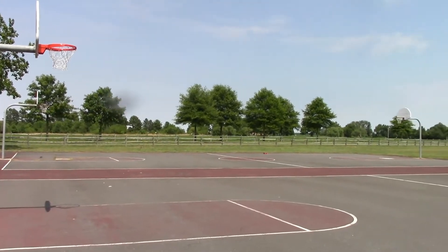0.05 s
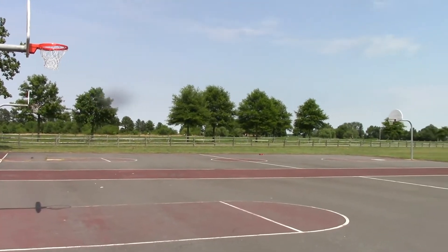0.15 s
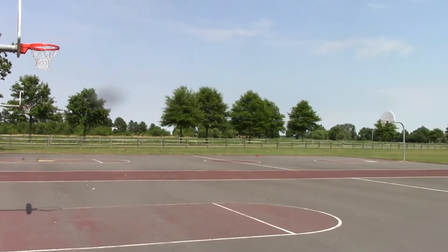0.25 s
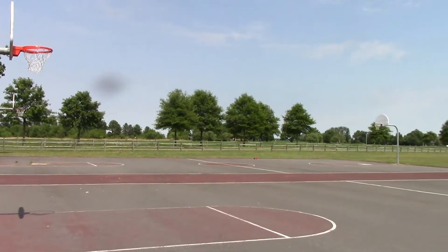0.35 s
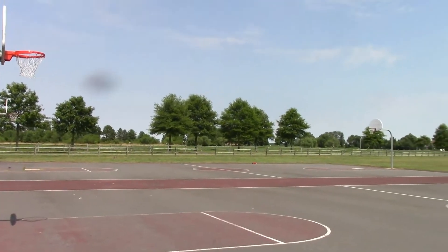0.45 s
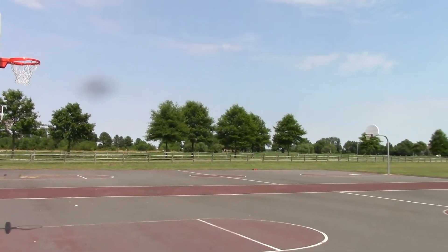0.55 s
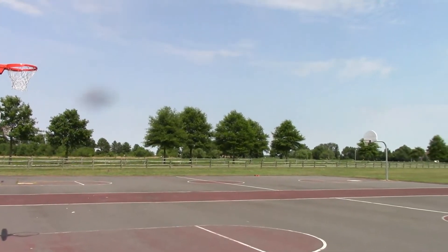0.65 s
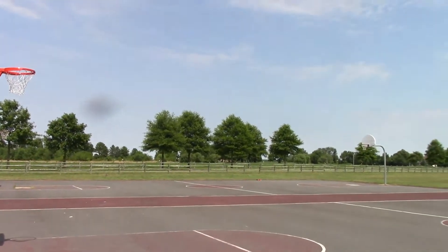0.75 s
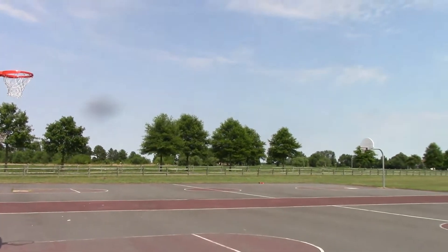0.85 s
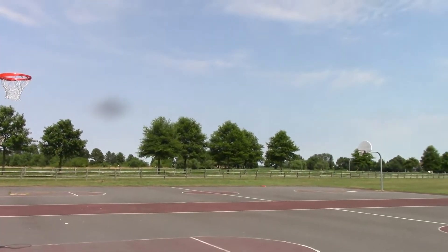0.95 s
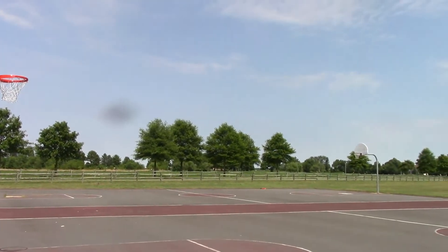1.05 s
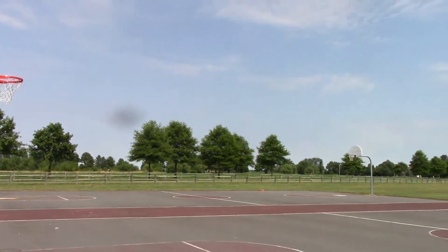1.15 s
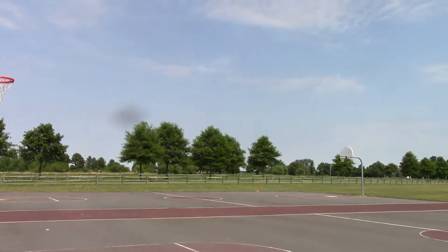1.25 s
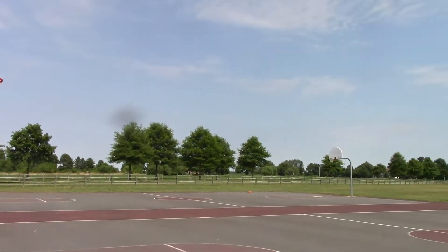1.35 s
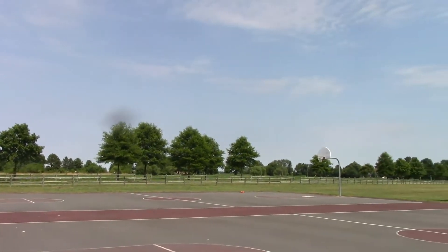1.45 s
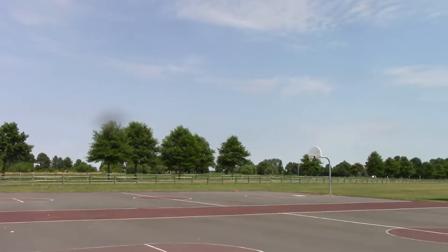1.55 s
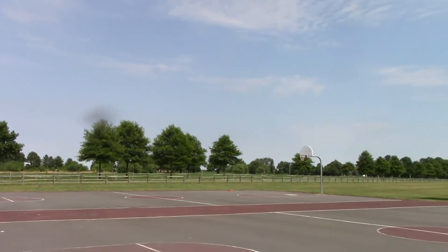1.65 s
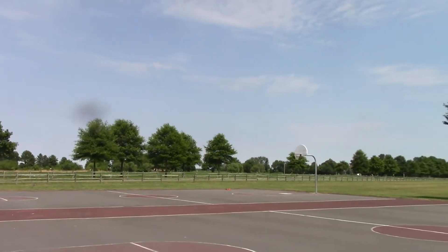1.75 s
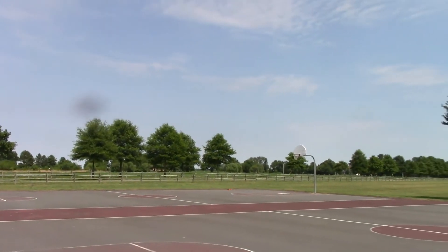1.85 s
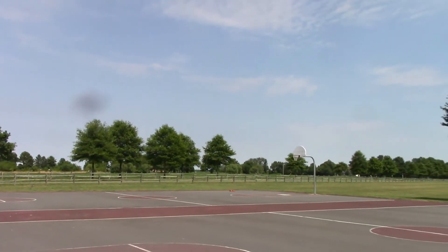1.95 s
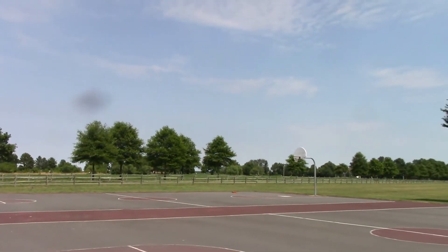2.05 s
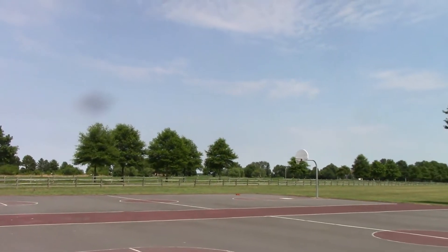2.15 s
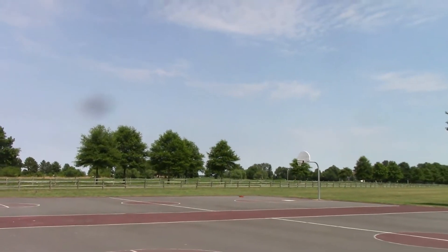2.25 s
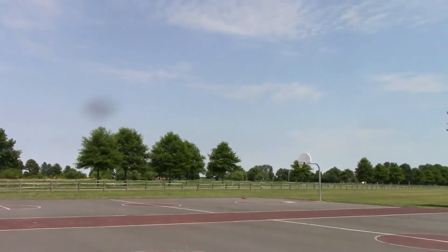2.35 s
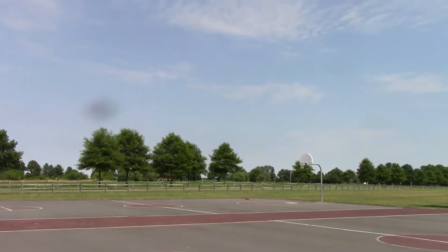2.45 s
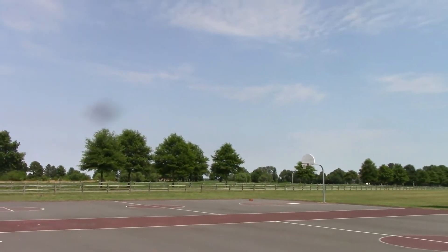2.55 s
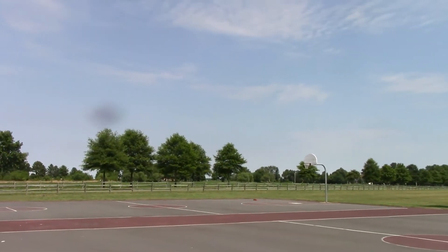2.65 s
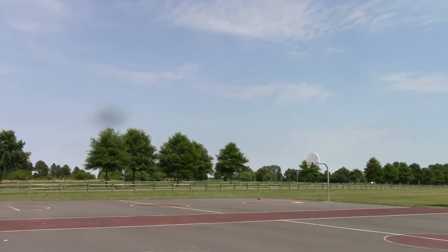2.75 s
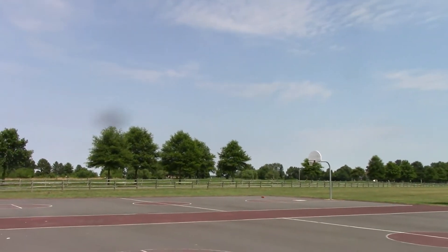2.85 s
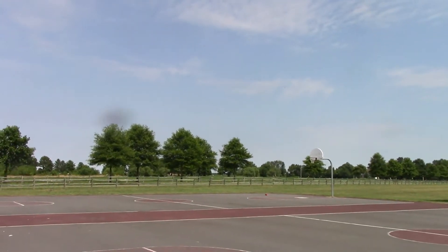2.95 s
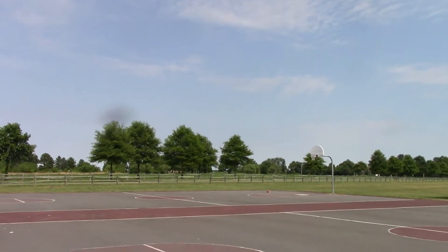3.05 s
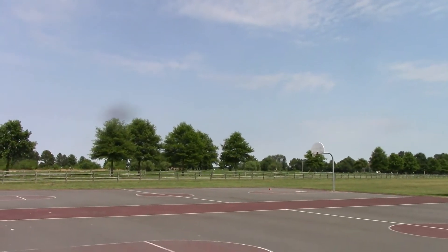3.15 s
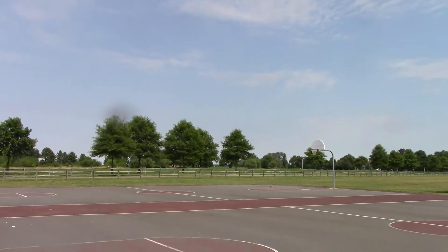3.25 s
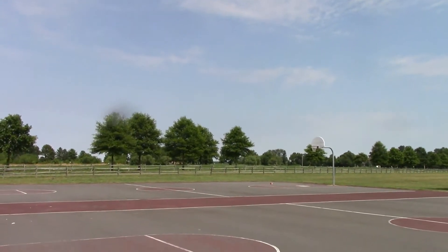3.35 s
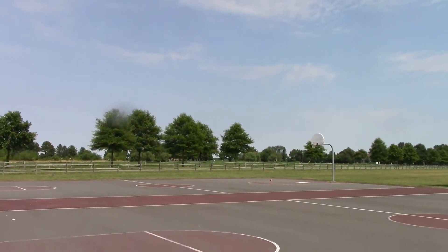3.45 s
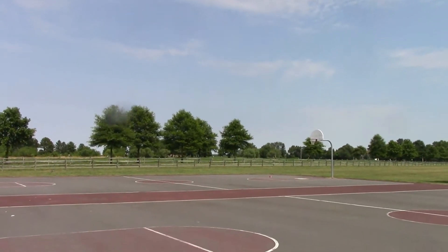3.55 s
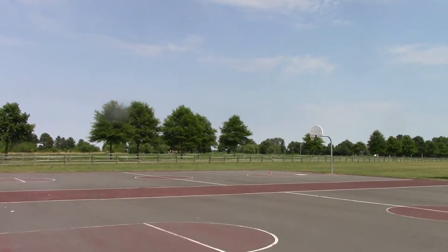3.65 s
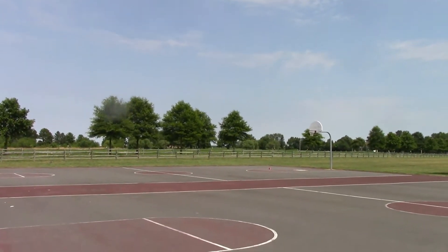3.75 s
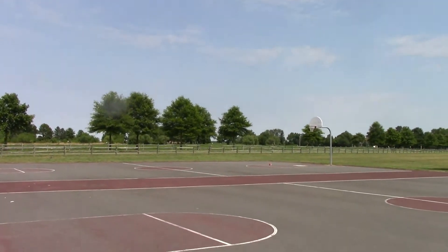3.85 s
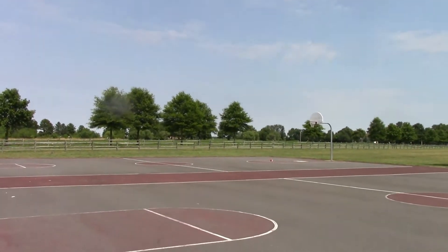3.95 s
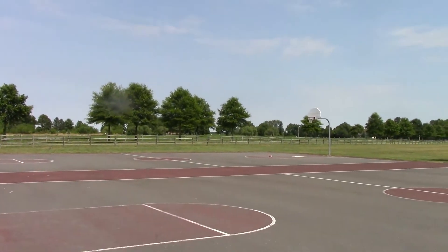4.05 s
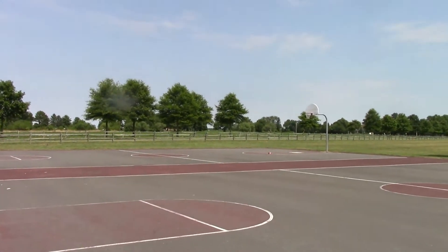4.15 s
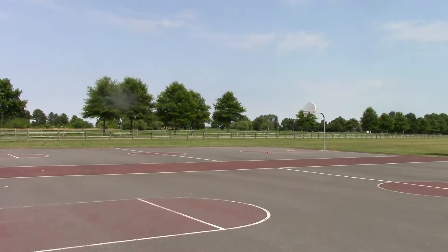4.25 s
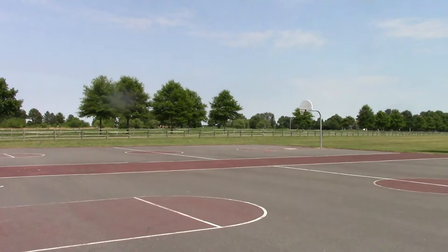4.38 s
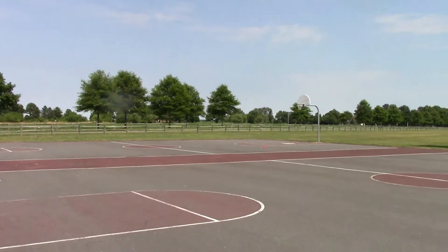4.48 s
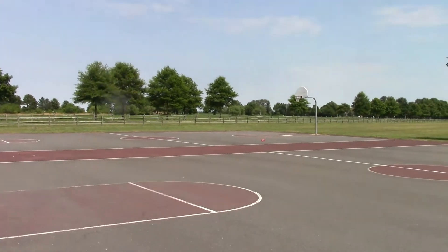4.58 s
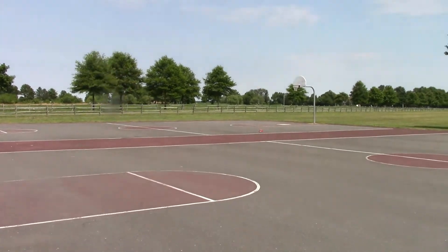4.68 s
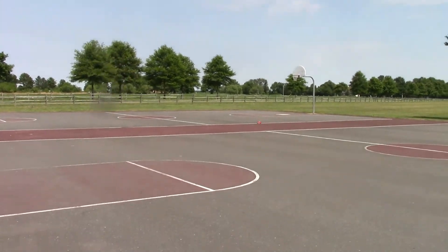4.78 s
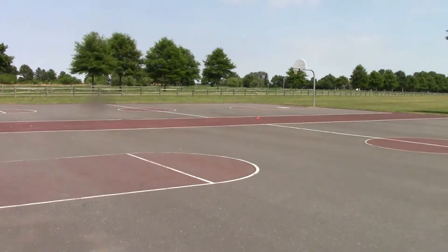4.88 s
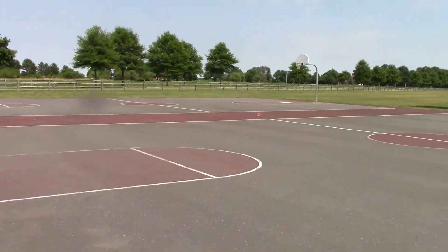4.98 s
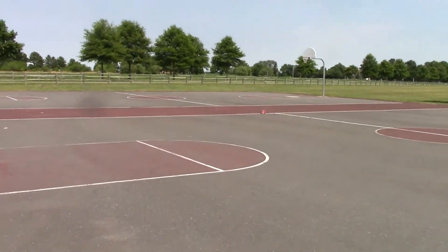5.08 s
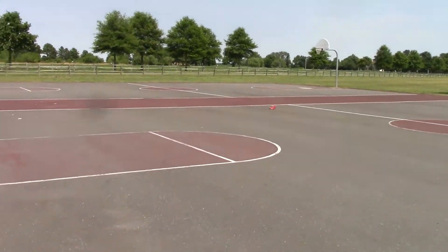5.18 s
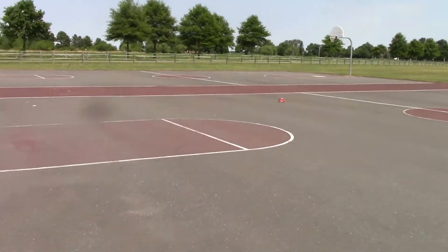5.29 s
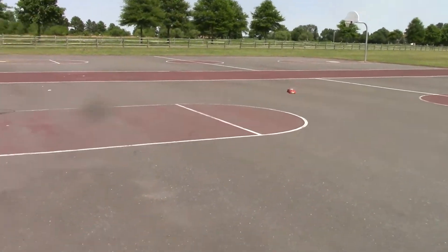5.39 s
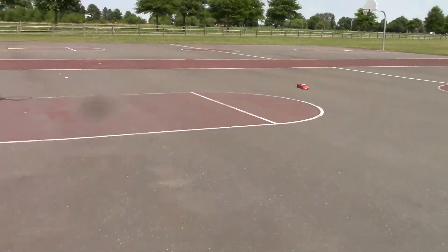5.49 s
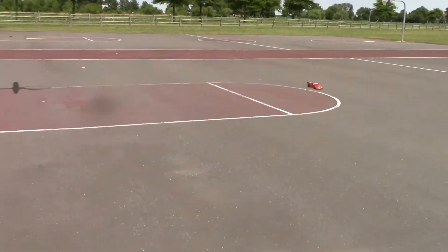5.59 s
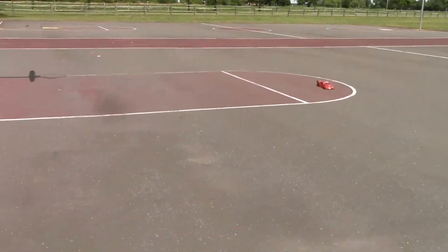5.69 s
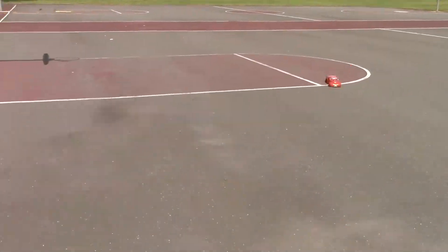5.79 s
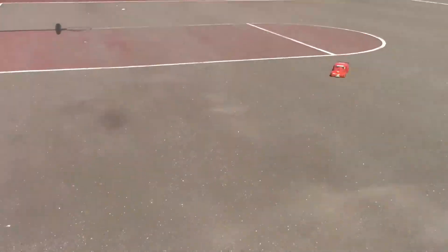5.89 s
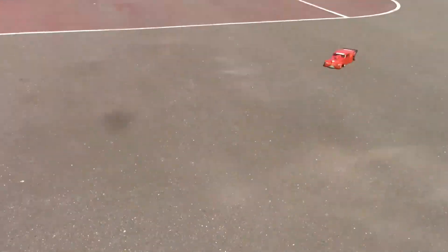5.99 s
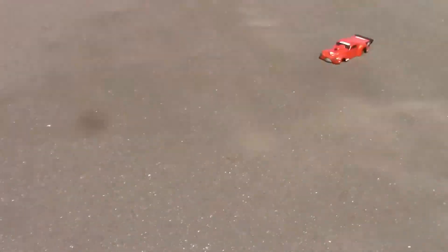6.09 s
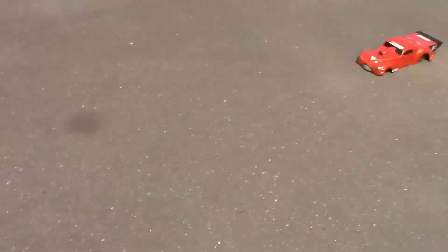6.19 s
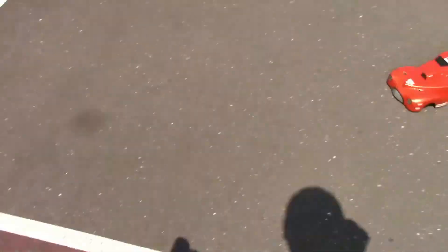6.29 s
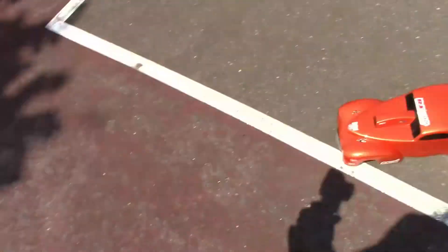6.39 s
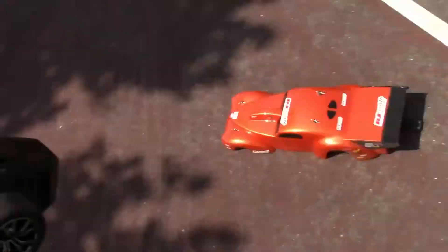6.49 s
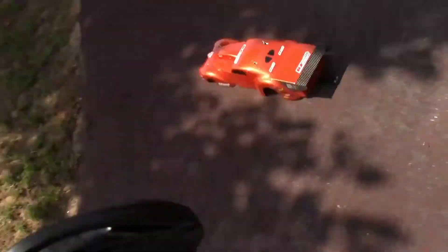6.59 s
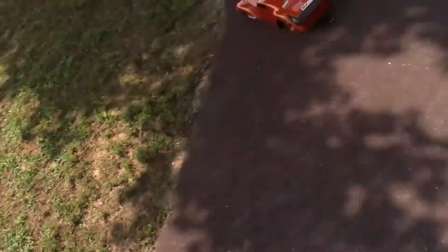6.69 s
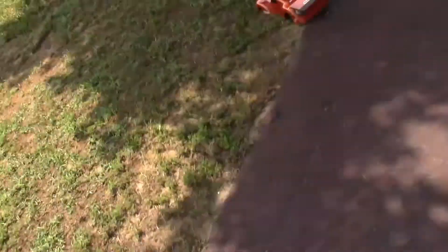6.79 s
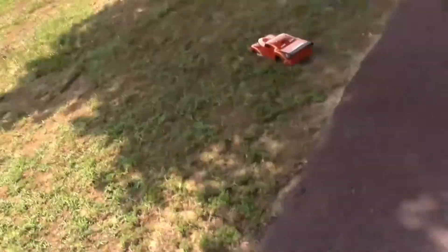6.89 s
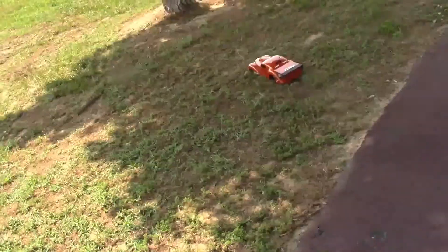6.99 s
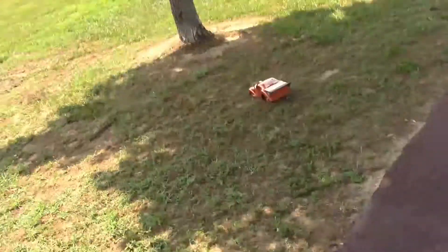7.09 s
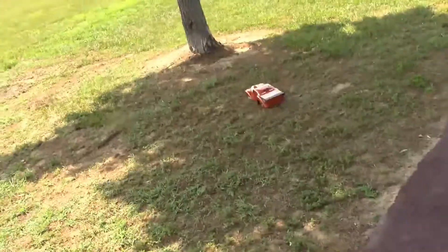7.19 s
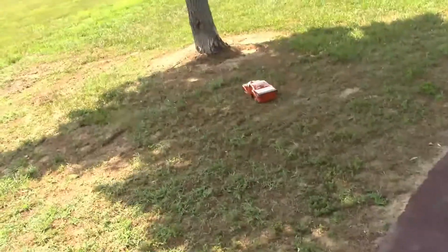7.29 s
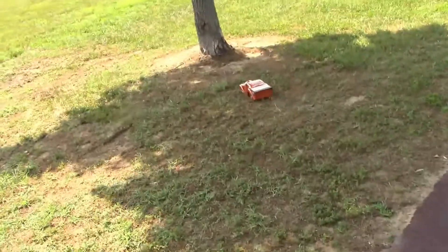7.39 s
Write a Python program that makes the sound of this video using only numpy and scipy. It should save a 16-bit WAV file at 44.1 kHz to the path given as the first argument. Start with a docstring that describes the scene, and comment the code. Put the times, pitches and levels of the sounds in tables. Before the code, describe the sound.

Wind buffets over quiet outdoor hiss and a few bird chirps, then a small remote-control car rushes up, clatters past loudly and fades.

```python
"""Asphalt court edged by grass: an electric toy car races in, passes at the listener's feet and bounces off.
Grit under the tyres and bumps drive a resonant plastic shell and noisy treads; chassis scrapes ring too.
The motor whine surges when the wheels skip; gears whirr in two narrow bands of smeared tone.
Leaves and far traffic hiss as filtered noise, soft rustles sound close by, a far buzz throbs in two spells.
A bird chirps in falling sine sweeps; gusts, slaps of air and the car's wake buffet the two ports as low noise."""
import sys
import numpy as np
from scipy import signal
from scipy.fft import rfft, irfft, next_fast_len
from scipy.io import wavfile

SR = 44100
rng = np.random.default_rng(int(sys.argv[2]) if len(sys.argv) > 2 else 0)


def digitize_waveform(pressure):
    """Quantize a signal to 16-bit integers and store it at the path in sys.argv[1].

    Rows of a 2-D input are taken as channels; values are limited to [-1, 1].
    """
    field = np.atleast_2d(pressure).T
    bounded = np.clip(field, -1, 1)
    quanta = np.round(bounded * 32767).astype(np.int16)
    wavfile.write(sys.argv[1], SR, quanta)


N = 327663

# Plastic shell resonances. Each row: frequency in Hz, width in Hz, relative level in dB.
SHELL_MODES = [(760, 480, -2), (1400, 520, -1), (2070, 480, -1), (2700, 650, -2), (3450, 600, -7)]
# Tread noise spectrum. Each row: frequency in Hz, relative density in dB per Hz.
TREAD_SPECTRUM = [(2350, -5.5), (4000, -4), (4730, 1.5), (5580, 0), (6750, 5), (9600, 1.5), (12500, -22),
                  (21100, -120)]

TIME = np.arange(N) / SR
BINS_HZ = np.maximum(np.fft.rfftfreq(next_fast_len(N), 1 / SR), 1)
LEFT_RIGHT = np.array([[1], [-1]])   # opposite signs at the two ports


def amp(db):
    """Decibels to gain."""
    return 10 ** (np.asarray(db) / 20)


def rms_one(x):
    """Scale to rms 1."""
    return x / np.sqrt(np.mean(x ** 2) + 1e-20)


def in_time(rows):
    """Columns of a curve over time, one value a sample."""
    s, *columns = np.transpose(rows)
    return [np.interp(TIME, s, column) for column in columns]


def on_bins(points):
    """A (Hz, value) table read at every spectral bin, along log frequency."""
    hz, value = np.transpose(points)
    return np.interp(np.log(BINS_HZ), np.log(hz), value)


def colour(x, gain):
    """Filter by a gain per bin."""
    size = next_fast_len(N)
    return irfft(rfft(x, size) * gain, size)[..., :N]


def butterworth(x, order, hz, kind="low"):
    """Butterworth filter with the given corner or corners."""
    return signal.sosfilt(signal.butter(order, hz, kind, fs=SR, output="sos"), x)


def drift(rate_hz):
    """Slow random wander of rms 1: noise through two equal low-pass poles."""
    r = np.exp(-2 * np.pi * rate_hz / SR)
    noise = rng.standard_normal(N + SR)
    settled = signal.lfilter([1], [1, -2 * r, r * r], noise)[SR:]
    return rms_one(settled)


def ring(x, hz, width_hz):
    """Two-pole resonance with gain 1 on top."""
    r = np.exp(-np.pi * width_hz / SR)
    zeros = [(1 - r * r) / 2, 0, (r * r - 1) / 2]
    poles = [1, -2 * r * np.cos(2 * np.pi * hz / SR), r * r]
    return signal.lfilter(zeros, poles, x + 1e-18)


def bursts(times_s, levels_db, t60s, rises_s):
    """Envelope of blows: a short linear rise, then an exponential fade."""
    out = np.zeros(N)
    for s, level_db, t60_s, rise_s in np.broadcast(times_s, levels_db, t60s, np.maximum(rises_s, 1e-4)):
        t = np.arange(int((t60_s + rise_s) * SR)) / SR
        fade = amp(level_db - 60 * np.maximum(t - rise_s, 0) / t60_s)
        blow = fade * np.minimum(t / rise_s, 1)
        i = round(s * SR)
        out[i:i + len(t)] += blow[:N - i]
    return out


def swells(middles_s, heights, halves_s):
    """Sum of bell-shaped swells, each down to 1/e at its half length."""
    return sum(h * np.exp(-((TIME - s) / half_s) ** 2) for s, h, half_s in zip(middles_s, heights, halves_s))


def grit(per_s, spread_db):
    """Random clicks of uneven size and sign, as from stones under a tyre; two unrelated streams."""
    sizes = amp(spread_db * np.minimum(rng.exponential(1, (2, N)), 5))
    signs = rng.choice([-1, 1], (2, N))
    struck = rng.random((2, N)) < per_s / SR
    return sizes * signs * struck


def narrow_tone(hz, width_hz):
    """A tone of rms 1 smeared by slow noise on its cosine and sine; width_hz is the noise corner."""
    phase = 2 * np.pi * np.cumsum(hz) / SR
    return rms_one(drift(width_hz) * np.cos(phase) + drift(width_hz) * np.sin(phase))


def wind():
    """Eddies burst on the ports as lumpy low noise; weak gusts are duller than strong ones."""
    # Gusts before flutter. Each row: middle in seconds, peak in dB, half length in seconds, deep thud in dB.
    gust_rows = [(0.0, -31, 0.028, -60), (0.033, -28, 0.018, -60), (0.07, -26, 0.024, -66),
                 (0.117, -27.5, 0.037, -60), (0.204, -35.5, 0.045, -60), (.43, -51, 0.033, -56),
                 (0.676, -49, 0.085, -64), (0.849, -37.5, 0.038, -61), (1.02, -48, 0.024, -65),
                 (1.606, -54, 0.064, -59), (1.764, -55, 0.073, -63), (2.014, -55, 0.1, -67),
                 (2.125, -48, 0.039, -56), (2.287, -56, 0.061, -48), (2.396, -54, 0.014, -58),
                 (2.484, -48.5, 0.023, -52), (2.778, -62, 0.017, -62), (3.625, -80, 0.03, -54),
                 (4.406, -69, 0.65, -65), (5.142, -53, 0.058, -46), (5.28, -64, 0.073, -51),
                 (5.605, -40, 0.021, -39), (6.784, -60, .04, -80), (6.892, -46, 0.033, -77),
                 (7.16, -41, 0.045, -60), (7.375, -54, 0.16, -75)]
    # Slaps of air. Each row: start in seconds, level in dB, fade t60 in seconds, brightness 0-1.
    puff_rows = [(0.189, -25, 0.075, 1), (0.904, -28.5, 0.071, 1), (2.258, -29, 0.055, 0.2),
                 (3.314, -42.5, 0.08, 0.6), (5.092, -26, 0.051, 0.88), (5.673, -22.5, 0.098, 0.02)]
    # Eddy spectrum. Each row: frequency in Hz, relative density in dB per Hz.
    eddy_spectrum = [(65, -81), (110, -20), (208, 0.5), (422, 0.5), (461, 0.5), (584, -5.5), (1020, -14.5),
                     (1600, -26.5), (2080, -37), (3520, -120)]
    # Unlike part at the two ports. Each row: time in seconds, level relative to the common part in dB.
    side_rows = [(5.0, -59.5), (5.1, -17), (5.25, -58), (5.55, -23), (5.7, -19.5), (6.2, -18.5),
                 (6.45, -16.5), (6.6, -71)]
    # Air pushed by the car, before flutter. Each row: time in seconds, level in dB, low rumble in dB.
    wake_rows = [(5.44, -70, -68), (5.55, -43, -68), (5.66, -44, -58), (5.73, -29, -27), (5.84, -33, -31.5),
                 (5.9, -26, -28), (5.96, -26, -27.5), (6.13, -23.5, -24.5), (6.23, -23, -29),
                 (6.27, -8.5, -8), (6.3, -13.5, -14), (6.35, -9, -9), (6.38, -16, -19.5),
                 (6.46, -13, -14.5), (6.5, -14.5, -18), (6.53, -18.5, -36), (6.6, -27.5, -60),
                 (6.63, -62, -85)]
    calm_db, calm_thud_db = -66.5, -69.5   # floor between gusts

    s, peak_db, half_s, thud_db = np.transpose(gust_rows)
    blowing_db = 20 * np.log10(amp(calm_db) + swells(s, amp(peak_db), half_s))
    gust_db = blowing_db + 4.0 * drift(35.0)
    thud = amp(calm_thud_db) + swells(s, amp(thud_db), half_s)

    eddies = grit(per_s=2500., spread_db=2.0)
    mid, side = rms_one(colour(eddies, amp(on_bins(eddy_spectrum))))
    side = butterworth(side, 4, 180, "high")   # both ports share the slowest pressure
    side_db, = in_time(side_rows)
    both = mid + amp(side_db) * side * LEFT_RIGHT
    dull = rms_one(butterworth(both, 2, 340))
    deep = rms_one(butterworth(eddies[0], 3, [85, 210], "band"))
    thin = rms_one(butterworth(both, 2, 240, "high"))   # the wake's small eddies carry little bass

    bright = np.clip((gust_db + 48.0) / 18, 0, 1)
    gusts = amp(gust_db) * (bright * both + (1 - bright) * dull)
    gusts += thud * amp(1.3 * drift(18)) * deep

    passing = (TIME > wake_rows[0][0]) & (TIME < wake_rows[-1][0])
    wake, rumble = amp(in_time(wake_rows)) * passing
    gusts += amp(3.1 * drift(30)) * (wake * thin + rumble * (dull + amp(-20) * deep))

    s, peak_db, t60_s, share = np.transpose(puff_rows)
    share = np.clip(share, .01, .99)
    start_s = s - .004
    bright_db = peak_db + 20 * np.log10(share)
    dull_db = peak_db + 0.5 + 20 * np.log10(1 - share)
    bright_puffs = both * bursts(start_s, bright_db, t60_s, 0.0022)
    dull_puffs = dull * bursts(start_s, dull_db, t60_s, 0.0013)
    return gusts + bright_puffs + dull_puffs


def air():
    """Leaves and far traffic: smooth hiss, alike at both ports in the bass and unlike in the treble."""
    # Each row: time in seconds, level before flutter in dB.
    level_rows = [(0.0, -43.5), (0.72, -46), (1.17, -44.5), (1.46, -46.5), (2.29, -48), (2.7, -48.5),
                  (3.6, -47.5)]
    # Each row: frequency in Hz, relative density in dB per Hz.
    hiss_spectrum = [(35, -56), (60, -44), (107, -14), (694, -9), (817, -12.5), (961, -9.5), (1160, -11),
                     (1400, -6), (1760, -8.5), (3550, -7), (8600, -15), (15800, -34.5)]
    # Each row: frequency in Hz, left-right likeness 0-1.
    likeness_rows = [(60, 0.95), (130, 1), (290, 1.0), (640, 1.0), (1410, 1.0), (3100, 1), (6820, 0.72),
                     (15000, 0.091)]

    level_db, = in_time(level_rows)
    alike = np.clip(on_bins(likeness_rows), 0, 1)
    parts = np.sqrt([1 + alike, 1 - alike]) * amp(on_bins(hiss_spectrum))
    mid, side = colour(rng.standard_normal((2, N)), parts)
    return amp(level_db + 0.57 * drift(27)) * rms_one(mid + side * LEFT_RIGHT)


def scuffs():
    """Brief rustles close by: soft bursts of broad noise."""
    # Each row: start in seconds, level in dB, fade t60 in seconds.
    rustle_rows = [(.184, -36.5, 0.05), (.905, -40.5, 0.25), (1.615, -42.5, 0.36)]
    s, level_db, t60_s = np.transpose(rustle_rows)
    noise = butterworth(rng.standard_normal(N), 2, [500, 4500], "band")
    return rms_one(noise) * bursts(s, level_db, t60_s, 0.0064)


def buzz():
    """A far narrow band of smeared tone that throbs, heard in two spells."""
    # One list per spell. Each row: time in seconds, level before throb in dB, pitch in Hz.
    spells = [
        [(.78, -53, 4830), (.9, -54, 5040), (1.15, -55, 5080), (1.42, -55, 5030)],
        [(3.48, -55, 4920), (3.66, -58, 4840)],
    ]
    out = np.zeros(N)
    throb = amp(1.1 * drift(49))
    for spell in spells:
        level_db, hz = in_time(spell)
        from_edge_s = np.minimum(TIME - spell[0][0], spell[-1][0] - TIME)
        fade = np.clip(from_edge_s / .03, 0, 1)
        out += fade * amp(level_db) * throb * narrow_tone(hz, width_hz=210.)
    return out


def bird():
    """Short whistles whose pitch falls exponentially as they swell and fade, stronger on the right."""
    # Each row: start in seconds, level at the centre in dB.
    chirp_rows = [(2.026, -49), (2.229, -49), (2.432, -50), (2.636, -48.5), (2.838, -49)]
    length_s, fall_s = .046, .024
    start_hz, toward_hz = 4700, 3200
    t = np.arange(int(length_s * SR)) / SR
    hz = toward_hz + (start_hz - toward_hz) * np.exp(-t / fall_s)
    swell = np.sin(np.pi * (t / length_s) ** 1.6)
    note = np.sin(2 * np.pi * np.cumsum(hz) / SR) * swell
    out = np.zeros(N)
    for s, level_db in chirp_rows:
        i = round(s * SR)
        out[i:i + len(t)] += amp(level_db) * note
    return out * amp([[-2.5], [2.5]])


def car():
    """Road grit and bumps drive the shell and the treads; common and unlike parts give left and right."""
    # Before chatter and hops. Each row: time in seconds, shell rattle in dB, tread hiss in dB,
    # top octave relative to the hiss in dB.
    level_rows = [(2.6, -53.5, -94, -30.5), (3.5, -50, -85, -21), (3.95, -46.5, -63, -19),
                  (4.65, -39.5, -54.5, -28), (4.85, -36.5, -47, -8), (5.15, -34, -49, -13),
                  (5.3, -30.5, -40.5, -10.5), (5.43, -31.5, -35.5, -3), (5.65, -29.5, -35.5, -3.5),
                  (5.87, -27, -38, -2), (6.05, -22, -29, -2), (6.17, -12.5, -22.5, -3), (6.4, -17, -22, -7),
                  (6.62, -23.5, -29.5, -0.5), (6.78, -23.5, -30.5, -3), (6.93, -35.5, -38, -4.5),
                  (7.12, -29.5, -36.5, -9.5), (7.43, -39.5, -40.5, -10)]
    # Wheels off the ground, rolling noise drops. Each row: middle in seconds, half length in seconds, drop in dB.
    hop_rows = [(4.869, 0.017, 9), (5.048, 0.0051, 17), (5.117, 0.032, 2), (5.368, 0.042, 6.5),
                (5.68, 0.013, 5), (5.887, 0.0035, 4), (5.937, 0.0099, 9), (6.123, 0.0096, 2),
                (6.179, 0.0075, 5.5), (6.243, 0.0047, 3), (6.269, 0.026, 6), (6.369, 0.014, 4),
                (6.458, 0.016, 2), (6.714, 0.019, 9.5), (6.822, 0.017, 4), (7.04, 0.041, 11.5),
                (7.259, 0.04, 5)]
    # Treble balance, car passing on the right. Each row: time in seconds, left minus right in dB.
    pan_rows = [(5.3, 0.5), (5.7, 0), (6.05, -0.5), (6.35, -0.5), (6.6, -1.1), (7.2, -1)]
    # Shell noise between the resonances. Each row: frequency in Hz, relative density in dB per Hz.
    shell_spectrum = [(180, -32), (300, -1), (788, -5), (1060, -1.5), (1320, -5), (1860, -2.5), (2170, -3),
                      (4240, -9.5), (5000, -12), (6500, -19.5), (11000, -120)]
    # Top of the tread noise. Each row: frequency in Hz, relative density in dB per Hz.
    top_spectrum = [(5650, -39), (9600, -8.5), (10800, -1), (13300, -10.5), (14600, -14), (15600, -16.5)]
    # Filter of the unlike part. Each row: frequency in Hz, gain in dB.
    side_spectrum = [(1000, -63), (2500, -29.5), (4400, -29), (6000, -17), (7500, -17), (12000, -23)]
    # Each row: time in seconds, further gain of the unlike part in dB.
    side_rows = [(5.0, 2), (5.9, -16), (6.15, 6), (6.38, 6), (6.42, -17), (6.58, -29), (6.7, 1),
                 (6.85, -22), (7.43, -17)]

    rattle_db, hiss_db, top_db = in_time(level_rows)
    s, half_s, drop_db = np.transpose(hop_rows)
    lift_db = swells(s, drop_db, half_s)
    pan_db, = in_time(pan_rows)
    chatter_db = 1.4 * drift(30)   # wheels on the rough surface

    stones = rms_one(colour(grit(per_s=6000., spread_db=2.5), amp(on_bins(shell_spectrum))))
    # loose panels take turns, so the colour keeps changing; the streams are swapped for the resonances
    drive = [stones[::-1] * amp(2.6 * drift(16)) for mode in SHELL_MODES]
    rattle = rms_one(stones + shell_modes(drive))
    knock, crack = knocks(hiss_db - rattle_db)
    shell = amp(rattle_db - lift_db + chatter_db) * rattle + knock

    fine = grit(per_s=14000., spread_db=4.0)
    tread = rms_one(colour(fine, amp(on_bins(TREAD_SPECTRUM)))) * amp(1.7 * drift(21) - lift_db)
    top_gain = amp(top_db + 2.65 * drift(57) - 0.73 * lift_db)
    tread += rms_one(colour(fine, amp(on_bins(top_spectrum)))) * top_gain
    tread = tread * amp(hiss_db + .5 * chatter_db) + crack

    side_db, = in_time(side_rows)
    unlike = amp(side_db) * colour(shell[1] + tread[1], amp(on_bins(side_spectrum)))
    treble = tread[0] + scrape() + whine() + gears(lift_db)
    return reflected(shell[0]) + treble * amp(LEFT_RIGHT * pan_db / 2) + LEFT_RIGHT * unlike


def shell_modes(drive):
    """The plastic shell rings; drive holds one force for each resonance."""
    # The shell turns, so two resonances swell and sink.
    # Each row: time in seconds, third resonance change in dB, fifth resonance change in dB.
    facing_rows = [(3.9, 3, -6), (5.25, 2, -4), (5.45, 1, 8.5), (6.05, -2.5, 5), (6.2, 1, 4.5),
                   (6.6, 0.5, -5), (6.8, 3, 8), (7.2, -3, -2)]
    third_db, fifth_db = in_time(facing_rows)
    turned_db = [0, 0, third_db, 0, fifth_db]
    out = 0
    for k, (hz, width_hz, db) in enumerate(SHELL_MODES):
        out = out + amp(db + turned_db[k]) * (-1) ** k * ring(drive[k], hz, width_hz)
    return out


def knocks(treble_db):
    """Each bump is a blow and short judder driving resonances near its pitch, with a crack in the treads.

    treble_db, tread hiss relative to shell rattle, scales the crack."""
    # Each row: time in seconds, relative peak in dB, pitch struck in Hz, fade t60 in seconds,
    # tread crack relative to the peak in dB before treble_db, rise in seconds.
    bump_rows = [(3.693, -30, 1950, 0.043, -8, 0.00076), (3.833, -35.5, 1990, 0.13, -8, 0.002),
                 (3.927, -25, 1820, 0.042, -13, 0.0029), (3.988, -29.5, 1950, 0.05, -8, 0.0025),
                 (4.06, -27.5, 1880, 0.055, -12, 0.0058), (4.177, -28, 2350, 0.037, -4, 0.0038),
                 (4.221, -30, 1960, 0.042, 4, 0.0036), (4.285, -28, 1160, 0.065, -3, 0.0033),
                 (4.345, -24.5, 2060, 0.044, -13, 0.0032), (4.394, -26.5, 1810, 0.096, -3, 0.004),
                 (4.429, -29, 2100, 0.06, 1, 0.0038), (4.459, -26, 1380, 0.047, -10, .003),
                 (4.496, -22.5, 2040, 0.055, -10, 0.00084), (4.523, -23.5, 2000, 0.069, -12, .004),
                 (4.585, -27.5, 1980, 0.052, -11, 0.003), (4.698, -22.5, 1270, 0.047, -10, .003),
                 (4.833, -23.5, 1160, 0.047, -7, 0.0028), (4.902, -13.5, 1430, 0.076, -6, 0.0039),
                 (5.029, -19.5, 2370, 0.067, -9, 0.0027), (5.063, -20, 2470, .03, -10, 0.0014),
                 (5.071, -17.5, 2140, 0.048, -8, 0.0022), (5.13, -20.5, 2240, 0.054, -2, 0.0023),
                 (5.158, -26, 2010, 0.023, -8, 0.0022), (5.199, -17.5, 2830, 0.042, -6, .001),
                 (5.212, -20, 813, 0.039, 1.5, 0.0022), (5.261, -18.5, 2400, 0.044, -5, 0.0024),
                 (5.318, -12, 2070, 0.048, -6.5, 0.0032), (5.389, -21.5, 2660, .06, -4, 0.0026),
                 (5.404, -18, 2210, 0.07, -4, 0.0028), (5.528, -16.5, 1500, .05, -14, 0.0027),
                 (5.579, -17.5, 2300, 0.05, -6, .003), (5.6, -16, 1200, 0.06, -4, 0.0021),
                 (5.785, -23, 1400, .04, -10, .002), (5.857, -15.5, 1900, 0.045, -8, 0.0027),
                 (5.897, -5, 1370, 0.082, -5, 0.0018), (5.964, -10.5, 800, 0.14, -20, 0.0014),
                 (6.011, -5, 1800, 0.038, -6.5, 0.0023), (6.134, 0, 2280, 0.041, -2, 0.0015),
                 (6.152, -4.5, 2200, 0.086, 3, .006), (6.195, -20, 1590, 0.048, -8, 0.006),
                 (6.214, -3, 2700, 0.071, 1, 0.0091), (6.248, -3, 850, 0.069, -6.5, 0.0031),
                 (6.3, -8, 1300, 0.065, -11, 0.0037), (6.325, -5.5, 2100, .035, -13, 0.0021),
                 (6.355, -6, 1300, 0.066, -1, 0.0014), (6.409, -5.5, 2700, 0.042, -11, .002),
                 (6.432, -4.5, 1250, .04, -16, 0.0015), (6.484, -4, 2450, 0.058, -6, 0.0036),
                 (6.521, -3.5, 1600, 0.03, -12, 0.0027), (6.563, -11.5, 2200, 0.036, -5, 0.0019),
                 (6.66, -11, 2500, 0.049, -6, .003), (6.738, -11, 2170, 0.036, -4, .004),
                 (6.769, -11.5, 1610, 0.065, -14, 0.0036), (6.79, -15.5, 1450, 0.065, -4, .003),
                 (6.888, -18, 1480, 0.12, -5, 0.0084), (7.09, -14.5, 1700, 0.085, 1.5, 0.0019),
                 (7.116, -26, 1640, 0.09, -16, 0.0033), (7.127, -22, 2900, .04, -16, 0.0022),
                 (7.148, -22, 1080, 0.074, -15, .003), (7.219, -22, 2200, 0.047, -6, 0.0023),
                 (7.286, -23.5, 748, 0.042, -8, 0.0024), (7.359, -25.5, 1200, 0.028, -17, .001),
                 (7.393, -22.5, 2580, 0.11, -4, 0.0077)]
    s, peak_db, struck_hz, t60_s, crack_db, rise_s = np.transpose(bump_rows)
    start_s = s - .001
    judder = rms_one(grit(per_s=9000., spread_db=1.5))
    judder[:, np.round((s + rise_s / 2) * SR).astype(int)] = 3.0   # the blow itself
    drive = []
    for hz, _, _ in SHELL_MODES:
        drive_db = peak_db - 5 * np.log2(hz / struck_hz) ** 2
        drive.append(judder * bursts(start_s, drive_db, t60_s, rise_s))
    # the small shell gives off no bass
    knock = amp(7) * butterworth(shell_modes(drive), 2, 300, "high")
    noise = rms_one(colour(rng.standard_normal((2, N)), amp(on_bins(TREAD_SPECTRUM))))
    crack_t60_s = np.full(len(s), .029)
    crack = noise * amp(treble_db) * bursts(start_s, peak_db + crack_db, crack_t60_s, rise_s)
    return knock, crack


def reflected(x):
    """Add a dulled copy a little late, which combs the rattle."""
    # Share is negative (inverted) with the car underfoot.
    # Each row: time in seconds, mean delay in ms, share of the direct sound.
    echo_rows = [(3.3, 1.5, .35), (5.0, 1.5, .35), (5.5, 1.45, .3), (6.0, 1.42, .4), (6.24, 1.3, .4),
                 (6.3, 1.0, -.3), (6.45, .97, -.55), (6.7, .97, -.55), (6.73, 1.3, .7), (6.92, 1.3, .6),
                 (7.07, 1.2, .3), (7.43, 1.25, .3)]
    delay_ms, share = in_time(echo_rows)
    dull = colour(x, 1 / (1 + (BINS_HZ / 5000) ** 4))
    wavering_s = delay_ms * (1 + .035 * drift(4.7)) / 1000
    return x + share * np.interp(TIME - wavering_s, TIME, dull)


def whine():
    """A rough motor tone; its pitch surges as the wheels skip and the motor races."""
    # Each row: time in seconds, pitch with grip in Hz, level before flutter in dB.
    motor_rows = [(3.66, 6050, -64), (3.69, 6150, -54), (3.712, 6200, -62), (3.72, 4200, -54),
                  (3.745, 6150, -49), (3.8, 6050, -51), (3.9, 6200, -49), (4.0, 6200, -51),
                  (4.08, 6050, -44), (4.15, 6750, -45), (4.225, 6700, -41), (4.3, 6830, -46),
                  (4.41, 7750, -47), (4.46, 8250, -51), (4.53, 8400, -60), (4.548, 9900, -54),
                  (4.59, 10000, -49), (4.61, 9900, -70)]
    # Each row: middle in seconds, rise in Hz, half length in seconds.
    surge_rows = [(4.047, 1390, 0.016), (4.118, 1104, 0.023), (4.266, 2520, 0.02), (4.328, 2590, 0.017),
                  (4.382, 2400, 0.02), (4.433, 1265, 0.018), (4.487, 1075, 0.015), (4.56, 500, 0.01)]
    hz, level_db = in_time(motor_rows)
    hz = hz + swells(*np.transpose(surge_rows))
    sounding = (TIME > motor_rows[0][0]) & (TIME < motor_rows[-1][0])
    return sounding * amp(level_db + 3.2 * drift(40)) * narrow_tone(hz, width_hz=400.)


def scrape():
    """The chassis touches the ground: each touch is a puff of grinding noise that rings in it."""
    # Each row: start in seconds, relative peak in dB.
    touch_rows = [(4.9549, -6), (4.9642, -11), (4.971, -7.5), (4.978, -17), (4.983, -11), (4.9905, -17.5)]
    # Chassis resonances. Each row: frequency in Hz, width in Hz, relative level in dB.
    chassis_modes = [(2170, 1570, 2), (3750, 520, 2), (5240, 560, -2.5), (8400, 830, -12),
                     (10200, 660, -18), (13100, 2000, -11)]
    s, peak_db = np.transpose(touch_rows)
    noise = butterworth(rng.standard_normal(N), 2, 9000)
    grind = noise * bursts(s, peak_db, np.full(len(s), .03), 0.00048)
    return amp(-0.5) * sum(amp(db) * ring(grind, hz, width_hz) for hz, width_hz, db in chassis_modes)


def gears(lift_db):
    """The gear mesh whirrs in two narrow, fluttering bands that weaken by lift_db as the wheels lift."""
    # Before flutter. Each row: time in seconds, upper pitch in Hz, upper level in dB, lower level in dB.
    mesh_rows = [(5.05, 5050, -63, -63), (5.15, 5050, -48, -47), (5.33, 5020, -41, -46),
                 (5.45, 5000, -38.5, -42), (5.6, 4950, -36.5, -41), (5.8, 4900, -41, -56),
                 (5.93, 4900, -42, -49), (6.0, 4960, -42, -29.5), (6.12, 4900, -45, -34),
                 (6.35, 4900, -53, -49), (6.75, 5020, -34.5, -65), (7.1, 4930, -63, -41),
                 (7.25, 4900, -66, -62)]
    lower_hz = 4610
    upper_hz, upper_db, lower_db = in_time(mesh_rows)
    sounding = (TIME > mesh_rows[0][0]) & (TIME < mesh_rows[-1][0])
    upper = amp(upper_db + 1.6 * drift(35)) * narrow_tone(upper_hz, width_hz=115.)
    lower = amp(lower_db + 2.0 * drift(35)) * narrow_tone(np.full(N, lower_hz), width_hz=120.)
    return sounding * amp(-lift_db) * (upper + lower)


def scene():
    """All sources in the open air."""
    return wind() + air() + scuffs() + buzz() + bird() + car()


def record(dry):
    """The loudest peaks are rounded at full scale, the deep bass is thinned and the top is cut."""
    soft = dry / (1 + np.abs(dry) ** 6) ** (1 / 6)
    thin = butterworth(soft, 4, 50, "high")
    top_cut = signal.ellip(16, .3, 95, 15850, fs=SR, output="sos")   # ripple dB, stopband dB, cutoff Hz
    return signal.sosfilt(top_cut, thin)


dry = scene()
out = record(dry)
digitize_waveform(out)
```